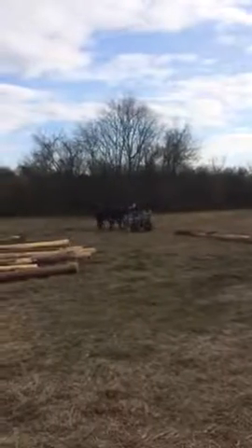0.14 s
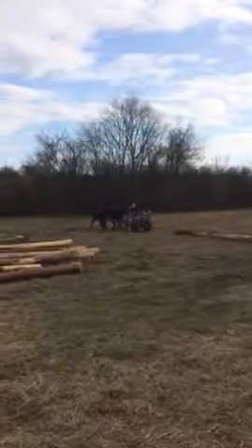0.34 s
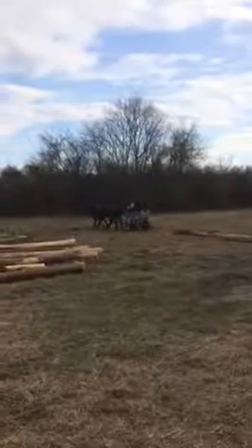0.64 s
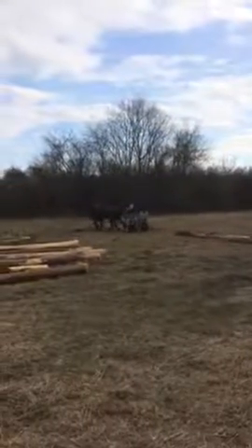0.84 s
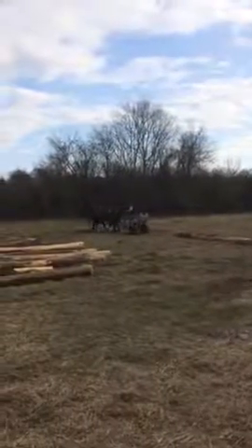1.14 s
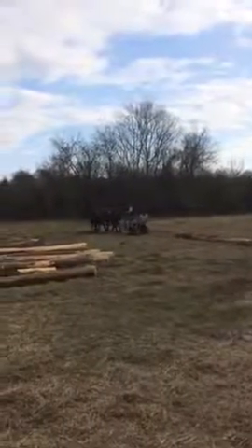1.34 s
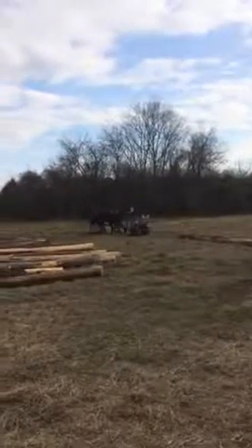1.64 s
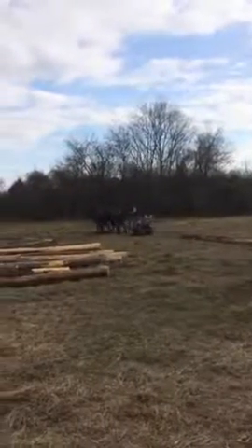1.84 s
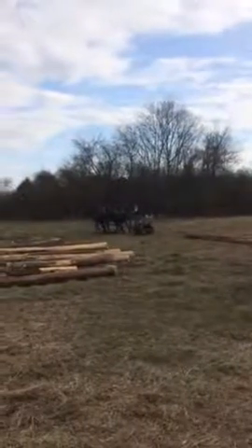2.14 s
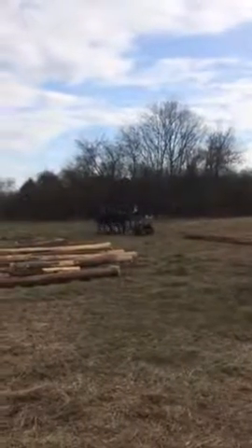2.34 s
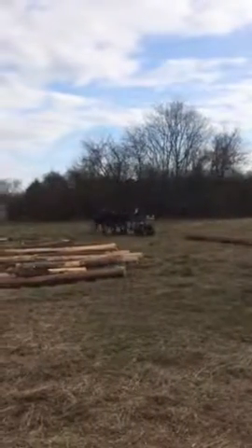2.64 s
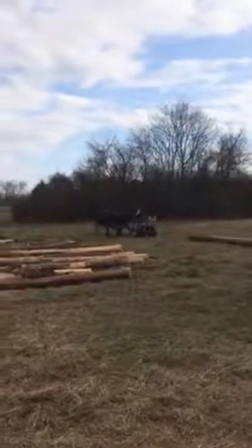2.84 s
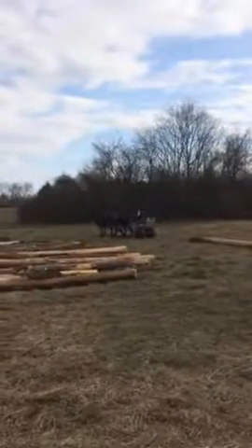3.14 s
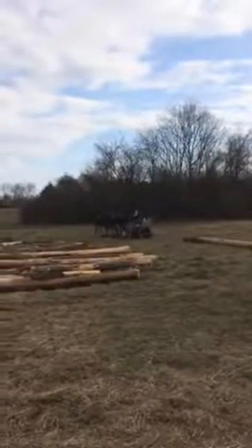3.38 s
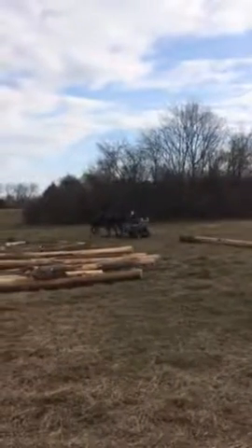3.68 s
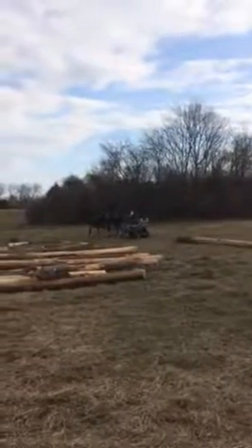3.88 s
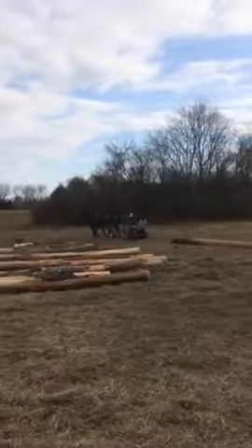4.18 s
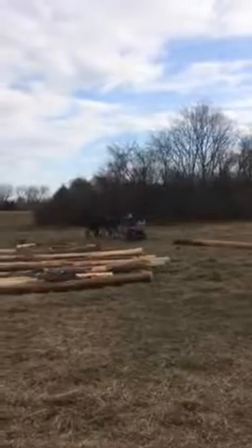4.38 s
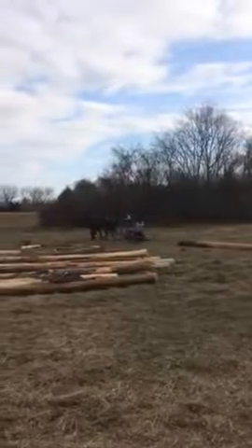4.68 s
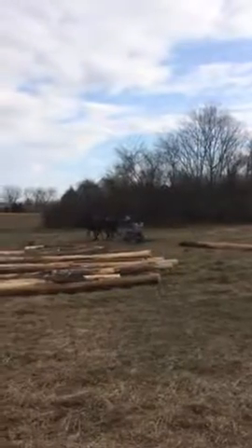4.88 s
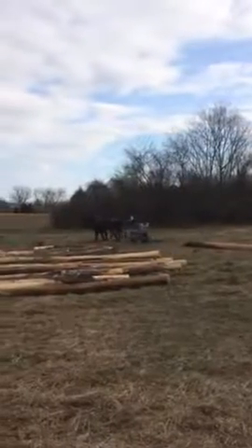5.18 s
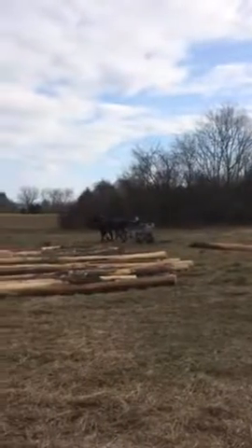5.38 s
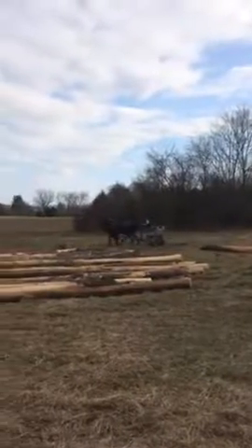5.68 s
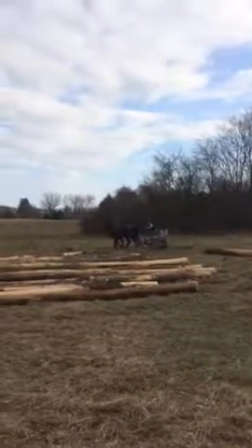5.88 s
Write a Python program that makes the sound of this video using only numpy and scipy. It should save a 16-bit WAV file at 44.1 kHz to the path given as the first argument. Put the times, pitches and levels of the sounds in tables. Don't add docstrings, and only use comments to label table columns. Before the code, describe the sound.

Outdoor harness jingle and loose iron rattle over faint wind and wheel rumble, with a dense sharp crackling burst midway and hollow thumps later.

```python
import sys
import numpy as np
from scipy import signal
from scipy.io import wavfile
from scipy.ndimage import uniform_filter1d

SR = 44100
rng = np.random.default_rng(int(sys.argv[2]) if len(sys.argv) > 2 else 0)


def master(y):
    cut = np.clip(np.atleast_2d(y).T, -1, 1)
    pcm = np.round(cut * 32767)
    wavfile.write(sys.argv[1], SR, pcm.astype(np.int16))


def volts(x):
    e = np.asarray(x, float) / 20
    return 10 ** e


N = 265482
T = np.arange(N) / SR

# f/Hz, density/dB per Hz
WIND_SPECTRUM = [(15, -42), (25, -4), (114, 8.5), (503, -22), (1160, -11), (2550, -35), (3080, -22),
                 (4610, -41), (5140, -59), (6920, -16.5), (11900, -16), (13600, -40), (16000, -86)]
# f/Hz, width/Hz, level/dB
WHEEL_MODES = [(105, 89, 2), (152, 36.6, 2), (195, 24.5, -0.5), (220, 165, -11)]
GRASS_MODES = [(3200, 2060, -1.5), (4310, 1130, 4), (6740, 8450, 11.5), (8560, 3560, 10.5),
               (11750, 8600, -12)]
FRAME_MODES = [(467, 1050, 7.5), (655, 158, 7), (920, 240, -1), (1134, 89, 8.5), (1410, 310, 4.5),
               (1850, 240, 0.5), (2054, 190, -1.5)]
LINK_MODES = [(3080, 50, -6), (3200, 60, -6), (3770, 28, -6), (5090, 35, -3), (5190, 30, 0),
              (5520, 40, -10), (6650, 50, -12), (6960, 70, -11)]
SHIMMER_MODES = [(10180, 40, -1), (11050, 32, -1), (11220, 35, -8), (13430, 24, 2), (13620, 40, -11),
                 (13880, 30, -3)]
# t/s, level/dB
ROUGHNESS = [(0, -50.5), (.5, -51), (.75, -53), (.9, -57.5), (2.5, -64), (2.75, -49.5), (2.95, -43),
             (3.3, -44), (3.45, -54), (3.77, -53), (4.3, -49), (5.06, -52.5), (5.4, -54), (6.02, -46.5)]
# t/s, length/s, chain/dB, grass/dB
TUGS = [(0.075, 0.2, -56, -57), (0.333, 0.16, -59, -58), (0.545, 0.052, -56.5, -62), (0.83, 0.15, -56, -57),
        (1.047, 0.32, -66, -64), (1.368, 0.064, -60, -54), (1.442, 0.17, -51, -52),
        (1.756, 0.085, -58, -57), (1.848, 0.092, -51, -52), (2.005, 0.13, -56, -54),
        (2.222, 0.094, -59.5, -58.5), (2.44, 0.19, -53, -54.5), (2.706, 0.31, -54, -52.5),
        (3.043, 0.16, -43, -43.5), (3.213, 0.14, -47, -48.5), (3.396, 0.17, -47, -51.5),
        (3.604, 0.083, -48.5, -54), (3.799, 0.1, -55, -55), (3.95, 0.17, -73, -61), (4.135, .03, -67, -58),
        (4.18, .07, -70, -55.5), (4.29, 0.056, -67, -56.5), (4.607, 0.23, -65.5, -62),
        (4.8, 0.073, -53, -47.5), (5.03, 0.12, -52.5, -54.5), (5.197, 0.21, -50.5, -57),
        (5.486, 0.26, -56, -63), (5.88, 0.052, -61.5, -75)]
TUG_ATTACK_S, TUG_T60_S, SLACK_CHAIN_DB, SLACK_GRASS_DB = 0.031, 0.38, -74.5, -66.5
# t/s, length/s, level/dB
JOLTS = [(0.172, 0.23, -65), (0.397, 0.21, -57.5), (0.75, 0.23, -58), (1.38, 0.18, -53),
         (1.914, 0.41, -60.5), (2.66, 0.34, -53), (3.046, 0.12, -45), (3.15, 0.044, -39),
         (3.21, 0.15, -46.5), (3.398, 0.21, -55), (3.86, 1, -57), (4.283, 0.92, -61), (4.822, 0.18, -49),
         (5.014, 0.071, -52), (5.092, 0.27, -55.5), (5.207, 0.075, -45.5), (5.36, 0.17, -65),
         (5.57, 0.084, -56)]
JOLT_ATTACK_S, JOLT_T60_S, SMOOTH_FRAME_DB = 0.025, 0.33, -63.5
# t/s, peak/dB, f/Hz, t60/s
HOOVES = [(0.389, -32.5, 201, 0.17), (0.441, -30, 213, 0.07), (1.539, -32, 200, 0.053),
          (2.099, -41.5, 105, 0.18), (2.773, -28, 148, 0.094), (2.859, -26.5, 161, 0.066),
          (3, -30.5, 167, 0.1), (3.167, -30.5, 167, 0.28), (3.21, -29, 178.5, 0.3), (3.31, -29, 183, 0.26),
          (3.797, -40.5, 183, 0.46), (4.027, -36, 195, 0.41), (4.196, -36.5, 159, 0.24),
          (5.049, -32.5, 198.7, 0.32), (5.189, -37.5, 197, 0.19)]
# t/s, f/Hz, level/dB
SQUEAK = [
    (5.362, 3910, -65),
    (5.384, 3945, -49),
    (5.406, 3955, -52),
    (5.425, 3980, -45),
    (5.452, 3980, -43),
    (5.467, 4020, -52),
    (5.486, 4000, -46.5),
    (5.502, 4020, -56),
]
AXLE_HUM = [
    (3.88, 1780, -51),
    (3.908, 1800, -57),
    (4.082, 1780, -64),
    (4.156, 1804, -59),
    (4.22, 1780, -61),
]
# t/s, peak/dB, pop re crack/dB, f/Hz,
# length/ms
SNAPS = [(0.5467, -34, -13, 3750, 0.39), (0.5565, -35.5, -21, 7200, 0.55), (0.612, -40, -18, 6100, 0.92),
         (0.7198, -13.5, -28, 3430, 0.62), (1.2405, -35.5, -15, 10200, 0.65), (1.867, -31, -32, 8300, 1.0),
         (2.908, -37, -17, 6000, .6), (2.9306, -25.5, -6.5, 5500, 0.48), (2.947, -27, -30, 12300, .6),
         (3.03, -34, -18, 9100, 0.54), (3.048, -39, -19, 7050, .7), (3.0726, -23, -4, 4800, 0.39),
         (3.0833, -22, -14, 3920, 0.38), (3.1133, -23, -13, 5860, 0.42), (3.1172, -13, -5, 6300, 0.7),
         (3.1283, -26, -19, 7040, 0.42), (3.1413, -3.5, -14, 7380, 0.21), (3.1668, -22, 0, 7040, 0.43),
         (3.179, -22, -0.5, 4200, 0.45), (3.1817, -23, -12, 5500, 0.35), (3.1566, -24, -12, 6500, 0.91),
         (3.1879, -15, 5.5, 5870, 0.76), (3.32, -32, -12, 8000, .8), (4.034, -37, 1, 4000, 1.0),
         (4.5165, -37.5, -20, 6000, 0.87), (4.6876, -36, -23, 10100, 0.81), (4.8, -42, -30, 10100, .6),
         (4.817, -31, -30, 6900, 0.7), (4.849, -38, -30, 5500, .6), (4.903, -30, -30, 7440, 0.67),
         (4.9575, -32.5, -17, 8050, 1), (5.066, -30, -27, 8700, 1), (5.18, -45, -36, 7800, .6),
         (5.7342, -31.5, -17, 6460, 0.35)]
BOUNCES = [(.7335, -22, -35, 4500, .7), (.7375, -27, -25, 4120, .6), (.7405, -32, -25, 4950, .5),
           (1.3535, -29, -16, 3500, .8), (1.364, -28, -15, 3970, .8), (3.0908, -40, -20, 6040, .5),
           (3.1405, -13, -27, 2300, .5), (3.1925, -17, -24, 3200, 0.46), (3.011, -33, -30, 6800, .7),
           (4.8505, -24, -30, 4800, .8), (5.2335, -27, -28, 4160, .6), (5.69, -42, -25, 7500, .8)]
# t/s, peak/dB, f/Hz, t60/s, noisy share/0-1
KNOCKS = [(0.16, -49, 1355, 0.52, 0.53), (0.39, -42, 595, 0.13, 0.54), (0.545, -37, 1710, 0.056, 0.7),
          (1.009, -52, 1080, 0.082, 0.1), (1.37, -28.5, 1477, 0.087, 0.37), (1.49, -42.5, 1195, 0.13, 0.3),
          (2.795, -37, 1800, .04, 0.9), (4.83, -33, 1355, 0.2, 0.05), (5.597, -41.5, 1550, 0.054, .4),
          (4.14, -51, 750, 0.54, 0.64), (4.29, -47.5, 905, 0.55, 0.68), (4.63, -49, 1404, .15, 0.2),
          (4.72, -44, 1500, 0.11, 0.3), (1.399, -34.5, 1340, 0.14, 0.65), (2.093, -45.5, 610, 0.11, 0.7),
          (2.292, -44.5, 1020, 0.2, 0.47), (2.744, -49, 1210, 0.56, 0.16), (2.684, -38, 3900, 0.11, 0.72),
          (2.7945, -26.5, 6170, 0.039, 0.78), (5.013, -29.5, 3210, 0.074, 0.8),
          (2.93, -37.5, 2210, 0.037, 0.9), (3.1425, -15, 830, 0.024, 0.85), (3.332, -45, 1400, 0.19, 0),
          (3.454, -44, 1320, 0.21, 0.4), (3.844, -39.5, 1075, 0.34, 0.52), (4.023, -39.5, 637, 0.09, 0.5),
          (4.359, -45, 1010, 0.14, 0.35), (4.509, -39, 1390, 0.16, 0.27), (4.591, -41.5, 1415, 0.22, 0.3),
          (4.691, -38.5, 1145, 0.15, 0.57), (4.754, -40, 1370, 0.099, 0), (4.915, -30.5, 646, 0.12, 0.5),
          (5.018, -29, 740, 0.11, 0.9), (5.162, -37.5, 1320, 0.12, 0.2), (5.249, -32, 1170, 0.037, 0)]
# t/s, peak/dB, f/Hz, t60/s
CLINKS = [(4.005, -49, 3660, 0.11), (3.29, -38, 3500, 0.068), (1.455, -42, 7000, .04),
          (1.6, -42, 7500, 0.061), (2.12, -42, 6700, .05), (.095, -44, 1990, 0.13), (.165, -46.5, 3760, .2),
          (.19, -47, 6460, 0.21), (.22, -44, 3770, 0.17), (.265, -44, 5060, .1), (.44, -43.5, 3100, 0.17),
          (.585, -49, 5200, 0.12), (1.473, -26.5, 3800, 0.044), (1.81, -51, 2380, .15),
          (1.932, -41.5, 2310, 0.093), (2.062, -32, 3590, 0.071), (2.25, -42.5, 3550, 0.065),
          (3.412, -60, 2170, 0.14), (3.55, -37.5, 2210, .08), (3.545, -35.5, 2990, 0.077),
          (3.612, -39, 2100, 0.044), (0.257, -41, 2910, 0.18), (0.872, -41, 4310, 0.1),
          (1.0094, -41.5, 6370, 0.044), (1.2945, -47, 3090, 0.19), (1.469, -32.5, 3210, 0.099),
          (1.5855, -41, 5200, 0.078), (1.9304, -43, 3040, 0.11), (2.0356, -39, 3900, 0.17),
          (2.061, -36, 4020, 0.092), (2.1221, -36, 3520, 0.07), (2.7443, -40, 2860, 0.11),
          (2.8626, -27, 3080, 0.092), (2.9948, -39, 3470, 0.068), (3.27, -29.5, 5240, 0.063),
          (3.336, -28.5, 3063, 0.048), (3.4137, -40, 3200, 0.061), (3.4547, -44, 3130, 0.21),
          (3.6336, -41, 5080, 0.14), (4.21, -39, 3920, 0.058), (4.3535, -39, 3630, 0.04),
          (4.5923, -38.5, 3700, 0.094), (4.8694, -37.5, 3020, 0.15), (5.223, -32, 5030, 0.14),
          (5.5991, -42.5, 5250, 0.12)]
# t/s, peak/dB,
# f/Hz, t60/s
CLEAR_RINGS = [(.757, -36, 1140, .6), (.826, -42, 1140, .6), (5.27, -43, 1200, .3), (5.32, -44, 5170, .25),
               (.8424, -43.5, 5160, .19), (1.5244, -35.5, 3750, 0.19), (1.625, -47, 3750, 0.23),
               (3.92, -53.5, 3850, 0.4), (4.352, -48.5, 3620, 0.13), (3.845, -39, 2800, 0.17),
               (4.88, -43, 3400, 0.32), (4.6, -49, 6800, 0.11), (4.755, -46.5, 6550, .2),
               (5.64, -42, 6800, .05), (5.64, -42, 4100, .05), (1.59, -44, 2900, 0.13)]
# t/s, peak/dB, settled f/Hz, t60/s, rattle/dB
THUMPS = [
    (4.818, -22, 195, .2, -37.5),
    (4.894, -22, 191, 0.17, -65),
    (4.998, -21.5, 195, 0.17, -38),
]
# t/s, peak/dB, loudest f/Hz, lowest mode/dB
STRIKES = [(0.1161, -43, 11200, 0), (0.2558, -45, 11000, -7), (0.362, -46, 11100, 8),
           (0.4549, -40, 13400, -11), (0.8415, -38.5, 10100, 5), (0.8964, -40, 10200, -13),
           (1.295, -42, 10300, -2), (1.4371, -44, 10200, -8), (1.492, -45, 11100, -4),
           (1.5166, -31.5, 10200, 0), (1.5923, -31, 10900, -6), (1.9094, -31, 10200, -4),
           (2.0944, -47, 10100, 3), (2.1694, -39.5, 11000, -5), (2.6823, -47, 10200, -10),
           (2.7442, -40, 13300, -12), (3.3488, -32, 13400, -7), (3.4526, -44, 13400, -6),
           (3.5544, -32, 10300, 2), (3.6292, -39, 11100, 3), (3.907, -38, 11000, -1),
           (3.925, -42, 13400, -12), (5.0948, -35.5, 10100, -13), (5.218, -35, 10300, 10),
           (5.3183, -35, 11000, 4), (5.3892, -34.5, 10100, -14), (5.5, -54, 11000, -6),
           (5.6012, -56, 10200, -8), (5.666, -45, 13800, -9), (5.9449, -43, 13400, -1)]
STRIKE_T60_S, STRIKE_DB, OTHER_MODES_DB, LINK_LOW_HZ = 0.18, -11.5, -9, 5070
HOOK_HZ = [1075, 1145, 1292, 1464, 3200, 2968, 3089, 3356, 3768, 4118, 4533, 3284, 6643, 7138, 4054, 4183]
BAR_HZ = [463, 1150, 1372, 1513, 1610, 1814, 2153, 2896, 3063, 3768, 5270, 5792, 6982, 4242]
# level/dB, t60/s
HOOK_RINGS = [(2, 0.54), (4, 0.59), (0, 0.29), (10, .13), (9, 0.32), (10, 0.27), (8, 0.33), (6, 0.27),
              (7, 0.16), (7, .15), (9, .28), (5, 0.33), (0, .17), (-3, 0.17), (9, .15), (-1, 0.14)]
BAR_RINGS = [(-17, 0.66), (-4, 0.28), (4, 0.24), (10, 0.19), (-2, 0.2), (5, 0.21), (0, .1), (7, 0.16),
             (4.5, 0.12), (5.5, 0.23), (-8, 0.28), (-4, 0.18), (-1, 0.12), (-2, 0.19)]
# t/s, blow/dB, rattle length/s, crash/dB, crash f/Hz
HOOK_BLOWS = [
    (.720, -19, 0.021, -31.5, 4240),
]
BAR_BLOWS = [
    (1.346, -23, 0.017, -33.5, 3000),
    (3.838, -35.5, 0.016, -47, 2020),
    (5.221, -33.5, 0.015, -42, 3800),
]


def unit(x):
    return x / np.sqrt(np.mean(x ** 2))


def peak(x):
    return x / np.abs(x).max()


def band(x, hz, width_hz):
    b, a = signal.iirpeak(min(hz, SR / 2.2), hz / min(width_hz, SR / 3), fs=SR)
    return signal.lfilter(b, a, x)


def body(x, modes):
    return unit(sum((-1) ** k * volts(db) * band(x, hz, width_hz) / np.sqrt(width_hz)
                    for k, (hz, width_hz, db) in enumerate(modes)))


def walk(rate_hz, size=N):
    hold = int(SR / rate_hz)
    steps = np.repeat(rng.standard_normal(size // hold + 1), hold)
    return unit(uniform_filter1d(uniform_filter1d(steps, hold), hold)[:size])


def grit(rate_hz, spread_db, size=N):
    clicks = (rng.random(size) < rate_hz / SR) * rng.standard_normal(size)
    return clicks * volts(spread_db * np.minimum(rng.exponential(size=size), 4))


def add(out, s, x):
    i = int(s * SR)
    out[i:i + len(x)] += x[:N - i]


def fade(t, t60_s):
    return np.exp(-np.log(1000) * t / max(t60_s, .002))


def surges(starts, lengths, dbs, attack_s, t60_s, rest_db):
    power = volts(2 * rest_db) * np.ones(N)
    for s, length, db in zip(starts, lengths, dbs):
        t = T[:int((length + t60_s) * SR)]
        rise = np.clip(t / attack_s, 0, 1)
        add(power, s, (volts(db) * rise * fade(np.maximum(t - length, 0), t60_s)) ** 2)
    return np.sqrt(power)


def field():
    hz, db = np.transpose(WIND_SPECTRUM)
    parts = []
    for f in 28 * 2 ** np.arange(0, 9.2, .5):
        level_db = np.interp(np.log(f), np.log(hz), db) + walk(5.5)
        parts.append(volts(level_db) * band(rng.standard_normal(N), f, f / 3))
    return unit(sum(parts)) * volts(-55.5)


def wheels():
    level_db = np.interp(T, *np.transpose(ROUGHNESS)) + 0.33 * walk(8.5)
    return body(rng.standard_normal(N), WHEEL_MODES) * volts(level_db)


def grass(swish):
    return body(grit(5000, 0.39), GRASS_MODES) * swish * volts(2.5 + 0.12 * walk(24.7))


def frame(shudder):
    return body(grit(2500, 2.3), FRAME_MODES) * shudder * volts(-1 + 2.2 * walk(20))


def tackle(shake, count=14):
    pitches = 1000 * 2 ** np.linspace(0, 2.8, count) * (1 + 0.0646 * rng.standard_normal(count))
    ticks = unit(sum(band(band(grit(110, 2.7), hz, 35), hz, 340) for hz in pitches))
    return ticks * shake * volts(-6)


def whine(table, overtone_db, wobble):
    s, hz, db = np.transpose(table)
    turn = 2 * np.pi * np.cumsum(np.interp(T, s, hz) * (1 + wobble * walk(95))) / SR
    gate = uniform_filter1d(1. * (T > s[0]) * (T < s[-1]), 400)
    tone = np.sin(turn) + volts(overtone_db) * np.sin(2 * turn)
    return np.sqrt(2) * gate * volts(np.interp(T, s, db)) * tone


def snaps(table):
    out, t = np.zeros(N), T[:SR // 20]
    for s, db, dull_db, hz, ms in table:
        shape = np.exp(-t * 1000 / max(ms, .2)) * (1 - np.exp(-t / .0005)) ** 2
        echo = .15 * np.roll(shape, 60) * (t > .0014)
        air = rng.standard_normal(len(t))
        tone = np.sin(2 * np.pi * hz * t) + .8 * unit(band(air, hz, 1.4 * hz)) + .3 * air
        crack = peak(tone * (shape + echo) + .012 * air * fade(t, .03))
        late = t - .0008
        pop = -np.cos(2 * np.pi * 830 * late) * np.exp(-(late / .00075) ** 2)
        add(out, s, volts(db) * (crack + volts(dull_db) * pop))
    return out


def knocks(table, spread, rise_s, noise=0.27, pair=1.045):
    out, t = np.zeros(N), T[:SR // 3]
    for s, db, hz, t60_s, *share in table:
        noisy = np.clip(share[0] if share else noise, 0, 1)
        ring = np.sin(2 * np.pi * hz * t) + .5 * np.sin(2 * np.pi * pair * hz * t)
        near = band(rng.standard_normal(len(t)), hz, min(spread * hz, 2600))
        rattle = unit(band(near, hz, min(2 * spread * hz, 4000)))
        shape = fade(t, t60_s) * (1 - np.exp(-t / rise_s))
        add(out, s, volts(db) * ((1 - noisy) * ring + noisy * rattle) * shape)
    return out


def thumps():
    out, t, start_hz = np.zeros(N), T[:SR // 3], 730
    for s, db, hz, t60_s, rattle_db in THUMPS:
        turn = 2 * np.pi * np.cumsum(hz + (start_hz - hz) * np.exp(-t / 0.00314)) / SR
        tone = np.sin(turn) + .15 * np.sin(2.2 * turn + 1.2) + .15 * np.sin(1.6 * turn)
        tone = tone * fade(t, t60_s) * (1 - np.exp(-t / .0035))
        late = t / 0.026 * np.exp(1 - t / 0.022)
        rattle = late * body(grit(3000, 0.81, size=len(t)), FRAME_MODES)
        add(out, s, volts(db) * tone + volts(rattle_db) * rattle)
    return out


def links(jostle, modes, shared):
    return unit(sum(volts(db) * band(shared * jostle + np.roll(jostle, 9973 * (k + 1)), hz, w) / np.sqrt(w)
                    for k, (hz, w, db) in enumerate(modes)))


def chain(jingle):
    jostle = grit(140, 2.8) * volts(1.6 * walk(30))
    low = links(jostle, LINK_MODES, 0.24) * volts(-0.5)
    shimmer = links(jostle, SHIMMER_MODES, 0.29) * volts(-2)
    return (low + shimmer) * jingle


def strikes():
    out, t = np.zeros(N), T[:SR // 5]
    mode_hz, _, mode_db = np.transpose(SHIMMER_MODES)
    chance = rng.standard_normal((len(STRIKES), len(mode_hz)))
    for (s, db, hz, low_db), row in zip(STRIKES, chance):
        gains = volts(OTHER_MODES_DB + mode_db + 2.2 * row)
        gains[np.argmin(np.abs(mode_hz - hz))] = 1
        high = gains @ np.sin(2 * np.pi * np.outer(mode_hz * (1 + 0.0013 * row), t))
        low = volts(low_db - 1.5) * np.sin(2 * np.pi * LINK_LOW_HZ * (1 + 0.0071 * row[0]) * t)
        shape = fade(t, STRIKE_T60_S) * (1 - np.exp(-t / 0.00091))
        add(out, s, volts(db + STRIKE_DB + 2 * walk(100, size=len(t))) * (high + low) * shape)
    return out


def flutter(t, hz, db, t60_s, loose_db):
    gain = volts(db + loose_db * walk(56, size=len(t)))
    turn = 2 * np.pi * (hz * t + .08 * walk(45, size=len(t)) + rng.random())
    return gain * np.sin(turn) * fade(t, t60_s)


def clank(blows, pitches, rings, loose_db, crack):
    out, t = np.zeros(N), T[:SR // 2]
    modes = [(hz, *ring) for hz, ring in zip(pitches, rings)]
    damped = [(hz, 90 + 0.069 * hz, db / 2) for hz, db, _ in modes]
    for s, db, length, crash_db, hz in blows:
        ring = sum(flutter(t, *mode, loose_db) for mode in modes)
        swell = np.minimum(.15 * crack + 2 * t / length, 1.3)
        build = 0.2 * crack + (1.1 - 0.26 * crack) * np.sqrt(t / length)
        tail = np.where(t < length, build, fade(t - length, 5 * length)) + crack * fade(t, 0.0019)
        chatter = grit(8000, 1.5, size=len(t))
        crash = body(chatter, damped) + .7 * unit(band(band(chatter, hz, 1.3 * hz), hz, 2 * hz))
        add(out, s, volts(db) * peak(ring * swell) + volts(crash_db) * crash * tail)
    return out


def scene():
    shudder = surges(*np.transpose(JOLTS), JOLT_ATTACK_S, JOLT_T60_S, SMOOTH_FRAME_DB)
    s, length, chain_db, grass_db = np.transpose(TUGS)
    swish = surges(s, length, grass_db, TUG_ATTACK_S, TUG_T60_S, SLACK_GRASS_DB)
    jingle = surges(s, length, chain_db, TUG_ATTACK_S, TUG_T60_S, SLACK_CHAIN_DB)
    mix = field() + wheels() + grass(swish) + frame(shudder)
    mix += tackle(np.sqrt(shudder * swish))
    mix += knocks(HOOVES, 1.0, 0.0078)
    mix += volts(-2) * whine(SQUEAK, -11, wobble=.003)
    mix += volts(-3) * whine(AXLE_HUM, -30, wobble=.004)
    mix += snaps(SNAPS) + snaps(BOUNCES)
    mix += knocks(KNOCKS, 0.9, 0.0017)
    mix += knocks(CLINKS, .35, .002, noise=.45)
    mix += knocks(CLEAR_RINGS, .1, .002, noise=.25, pair=1.007)
    mix += thumps() + chain(jingle) + strikes()
    mix += clank(HOOK_BLOWS, HOOK_HZ, HOOK_RINGS, 2.4, .9)
    mix += clank(BAR_BLOWS, BAR_HZ, BAR_RINGS, 3.2, 1.1)
    return mix[None]


def band_limit(x):
    return signal.sosfilt(signal.butter(12, 16620, fs=SR, output="sos"), x)


def record(dry):
    x = signal.sosfilt(signal.butter(2, 45, "high", fs=SR, output="sos"), dry)
    return band_limit(x)


dry = scene()
out = record(dry)
master(out)
```